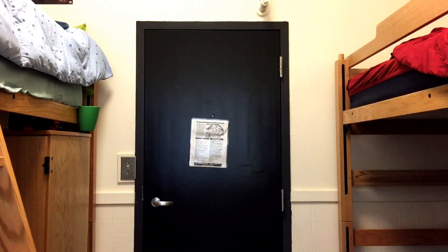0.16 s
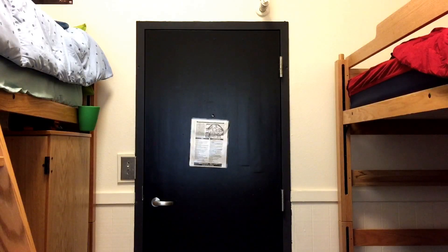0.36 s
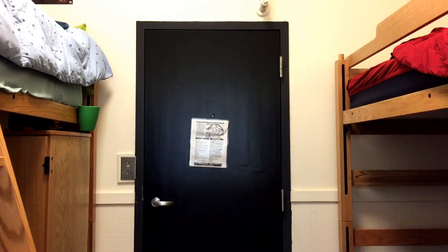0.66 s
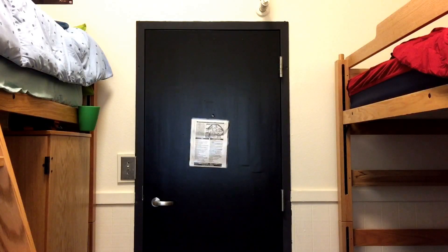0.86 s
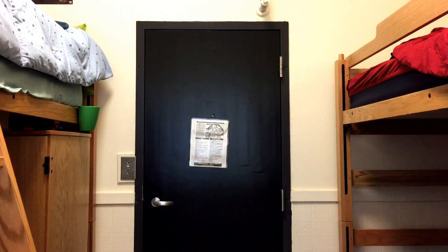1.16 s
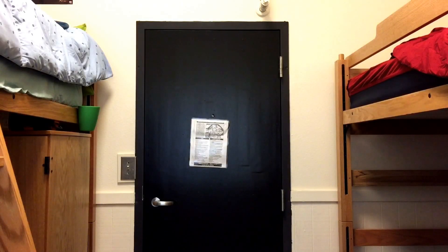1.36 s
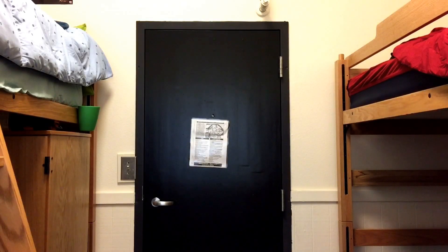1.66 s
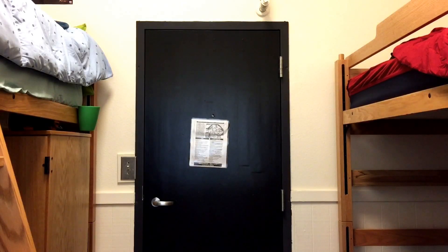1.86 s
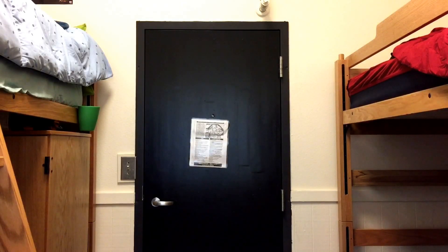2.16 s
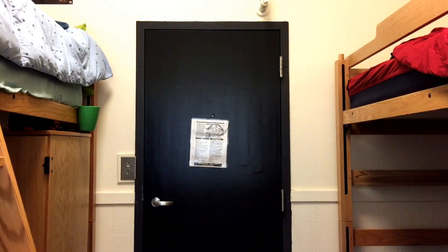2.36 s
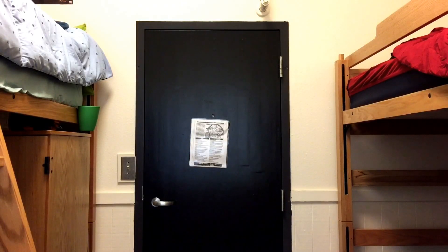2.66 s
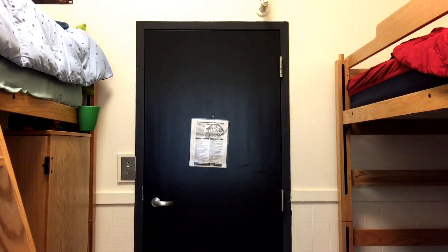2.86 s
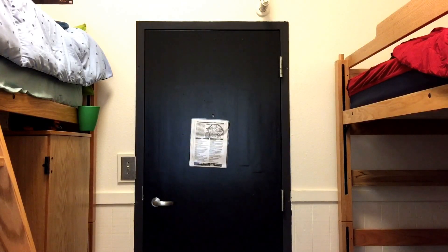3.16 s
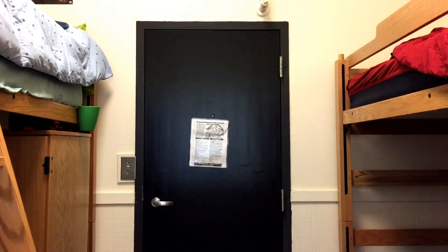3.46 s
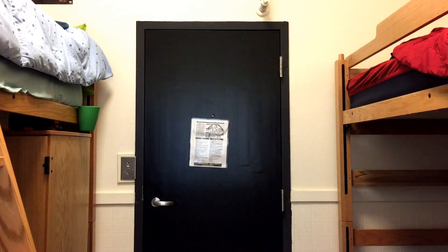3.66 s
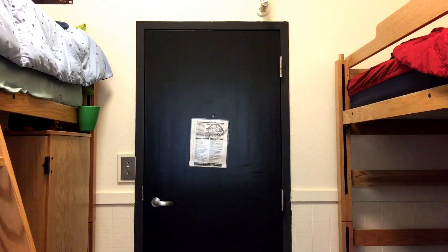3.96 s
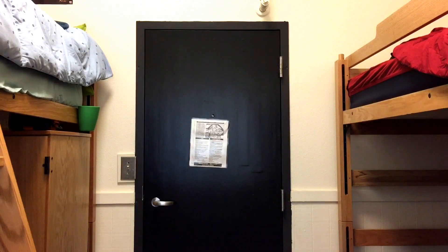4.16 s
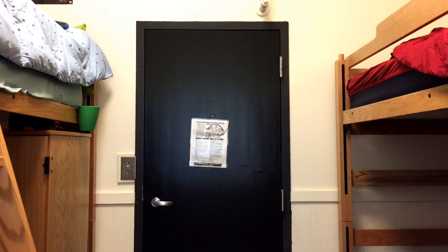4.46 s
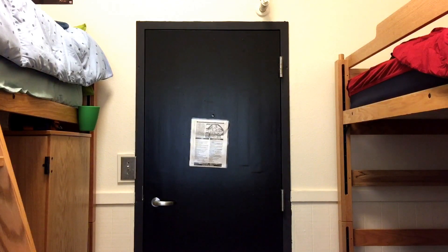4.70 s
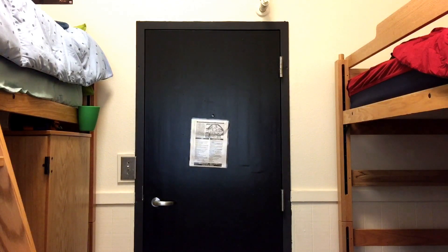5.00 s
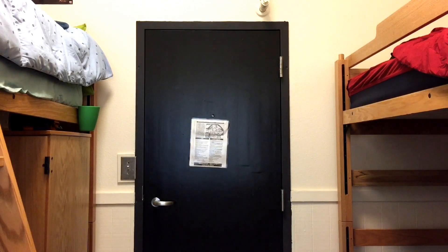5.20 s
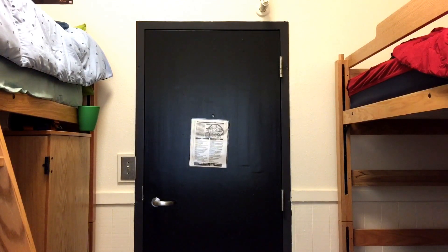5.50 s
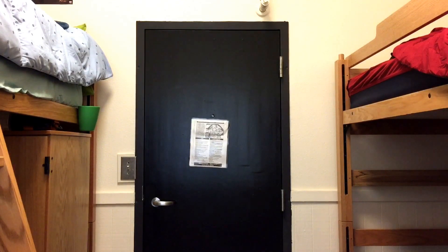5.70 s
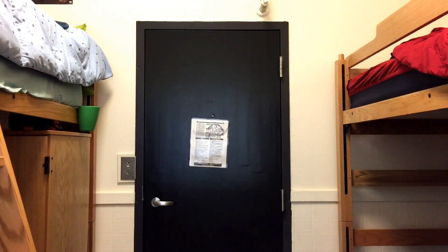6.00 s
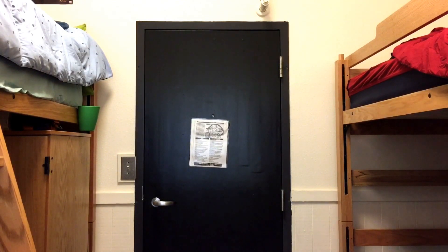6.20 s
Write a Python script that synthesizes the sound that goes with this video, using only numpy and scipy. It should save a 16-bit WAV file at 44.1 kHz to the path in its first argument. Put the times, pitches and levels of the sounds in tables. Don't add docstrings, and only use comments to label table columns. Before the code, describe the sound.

After seconds of low indoor hum and soft distant knocks, sharp key and bolt clacks shake a closed heavy door, with dull low thuds.

```python
import sys
import numpy as np
from scipy import signal
from scipy.fft import rfft, irfft, next_fast_len
from scipy.io import wavfile
from scipy.ndimage import uniform_filter1d

SR = 44100
rng = np.random.default_rng(int(sys.argv[2]) if len(sys.argv) > 2 else 0)


def invert_db(x):
    u = np.asarray(x, float) / 20
    return 10 ** u


def digitize_waveform(pressure):
    field = np.atleast_2d(pressure).T
    bounded = np.clip(field, -1, 1)
    quanta = np.round(bounded * 32767).astype(np.int16)
    wavfile.write(sys.argv[1], SR, quanta)


N = 279594


def in_time(rows):
    s, *columns = np.transpose(rows)
    return [np.interp(np.arange(N) / SR, s, c) for c in columns]


def at_hz(points, hz):
    table_hz, value = np.transpose(points)
    return np.interp(np.log(hz), np.log(table_hz), value)


def rms_one(x):
    return x / np.sqrt(np.mean(x ** 2) + 1e-20)


def drift(rate_hz):
    thin = 40
    r = np.exp(-2 * np.pi * rate_hz * thin / SR)
    noise = rng.standard_normal(N // thin + 2002)
    slow = signal.lfilter([1], [1, -2 * r, r * r], noise)[2000:]
    return np.interp(np.arange(N) / thin, np.arange(len(slow)), rms_one(slow))


def shaped(spectrum):
    size = next_fast_len(N)
    hz = np.maximum(np.fft.rfftfreq(size, 1 / SR), 1)
    return hz, rfft(rng.standard_normal(size)) * invert_db(at_hz(spectrum, hz))


def coloured(spectrum, patchy_db, patch_hz):
    hz, noise = shaped(spectrum)
    out = np.zeros(N)
    step = 2 * np.log2(hz / 25)
    for k in range(15):
        window = np.cos(np.pi / 2 * np.clip(step - k, -1, 1)) ** 2
        patch = irfft(noise * window, next_fast_len(N))[:N]
        out += patch * invert_db(patchy_db * drift(patch_hz))
    return rms_one(out)


def ring(force, hz, t60):
    r, w = invert_db(-60 / (t60 * SR)), 2 * np.pi * hz / SR
    return signal.lfilter([0, np.sin(w)], [1, -2 * r * np.cos(w), r * r], force + 1e-18)


# frequency in Hz, density in dB per Hz.
HISS_SPECTRUM = [(300, -33), (420, -8), (600, -4), (900, -4.5), (1400, -9), (2200, -14), (4300, -18.5),
                 (5000, -21.5), (5600, -19.5), (9300, -24), (10400, -27), (11300, -25), (15000, -27.5),
                 (15900, -25)]


def microphone_hiss():
    noise = irfft(shaped(HISS_SPECTRUM)[1], next_fast_len(N))[:N]
    return invert_db(-65) * rms_one(noise)


# frequency in Hz, density in dB per Hz.
RUMBLE_SPECTRUM = [(50, -18), (80, -16), (110, 4), (150, 2), (200, 1), (260, 3), (320, -4), (362, -5.5),
                   (385, -11.5), (480, -27.5), (700, -47.5)]


def rumble():
    return invert_db(-54.5) * coloured(RUMBLE_SPECTRUM, patchy_db=4.0, patch_hz=9.7)


def hum(curve, tone, flutter_hz):
    hz, share = in_time(tone)
    share = np.clip(share, 0, 1)
    phase = 2 * np.pi * np.cumsum(hz) / SR
    steady = np.sqrt(2) * np.sin(phase)
    noisy = drift(flutter_hz) * np.cos(phase) + drift(flutter_hz) * np.sin(phase)
    return invert_db(in_time(curve)[0]) * (np.sqrt(share) * steady + np.sqrt(1 - share) * noisy)


def throb(per_s, depth):
    rate = per_s * (1 + 0.2003 * drift(1.19))
    return 1 + depth * np.sin(2 * np.pi * np.cumsum(rate) / SR)


# time in seconds, level in dB.
LOW_HUM_LEVEL = [(0.0, -45), (0.1, -44), (0.17, -55), (0.88, -49), (3.69, -63.5), (3.74, -45), (3.99, -67),
                 (4.02, -45.5), (4.29, -59.5), (4.61, -49.5), (5.44, -47), (5.74, -66), (5.79, -56.5),
                 (6.16, -68), (6.22, -52.5), (6.34, -81)]
HIGH_HUM_LEVEL = [(0.0, -65), (0.92, -52), (1.11, -54.5), (1.73, -46), (1.87, -51), (1.99, -41),
                  (3.81, -52.5), (4.17, -69), (4.2, -61.5), (4.45, -53), (4.63, -70.5), (5.35, -55),
                  (5.4, -64), (5.72, -55.5), (6.29, -63.5), (6.34, -70)]
FAN_LEVEL = [(0, -70), (3, -68), (6.34, -65)]
# time in seconds, frequency in Hz, share of steady tone from 0 to 1.
LOW_HUM_TONE = [(0, 154, 0.96), (.3, 156.9, 0.08), (1.5, 154.5, 0.36), (4.2, 156.9, 0.55),
                (4.6, 153.3, 0.36), (5, 150, 0.9), (5.5, 143, 0.82), (5.7, 142.4, 0.8), (6.34, 140, 0.2)]
HIGH_HUM_TONE = [(0, 268, 0.25), (1.4, 265.6, 0.37), (2, 261.8, 0.87), (2.6, 259.1, 0.87), (3.2, 269, 0.84),
                 (3.8, 265.3, 0.77), (4.6, 262.2, 0.63), (5.4, 271.4, 0.44), (6.34, 266.3, 0.74)]
FAN_TONE = [(0, 358.9, 0.74), (6.34, 365.2, 0.36)]


def machinery():
    low = hum(LOW_HUM_LEVEL, LOW_HUM_TONE, flutter_hz=17.8)
    high = hum(HIGH_HUM_LEVEL, HIGH_HUM_TONE, flutter_hz=21.8) * throb(per_s=10.5, depth=0.37)
    fan = hum(FAN_LEVEL, FAN_TONE, flutter_hz=10.6)
    return low + high + fan


# time in seconds, level in dB.
BUSTLE_LEVEL = [(0, -65), (.5, -78), (1.25, -59.5), (2.2, -69.5), (2.7, -69.5), (4, -68), (5.05, -58),
                (5.26, -49.5), (6.34, -69)]
# frequency in Hz, density in dB per Hz.
BUSTLE_SPECTRUM = [(350, -28), (500, -24), (650, -15), (850, 0.5), (1100, 1.5), (1500, -6), (2500, -20),
                   (4000, -70)]


def bustle():
    return invert_db(in_time(BUSTLE_LEVEL)[0] - 10.5) * coloured(BUSTLE_SPECTRUM, patchy_db=4.5, patch_hz=6.4)


# start in seconds, peak level in dB, frequency in Hz.
FAR_KNOCKS = [(0.911, -56, 869), (1.049, -54, 864), (1.147, -55.5, 773), (1.248, -51, 750),
              (1.33, -52, 876), (1.379, -54.5, 807), (1.599, -52, 867), (1.66, -54.5, 804),
              (1.864, -52, 787), (2.135, -60, 864), (2.434, -57, 772)]


def corridor():
    out, puff = np.zeros(N), np.hanning(1800)
    for s, db, hz in FAR_KNOCKS:
        force = np.zeros(8000)
        force[:len(puff)] = puff * rng.standard_normal(len(puff))
        tone = ring(force, hz, 0.14)
        out[round(s * SR):][:len(tone)] += invert_db(db - 3.5) * tone / np.max(np.abs(tone))
    return out


# start in seconds, peak level in dB.
PUSHES = [
    (3.663, -47),
    (4.209, -65),
    (4.903, -46),
    (5.325, -33.5),
    (5.985, -51),
    (6.188, -51.5),
]
# frequency in Hz, density in dB per Hz.
SHUDDER_SPECTRUM = [(20, -58), (32, -25), (45, 9.5), (60, -0.5), (75, 9), (100, -14), (130, -33.5)]


def shudder():
    rise_s, fall_s = 0.048, 0.075
    t, gain = np.arange(N) / SR, invert_db(-67)
    for s, db in PUSHES:
        away = np.maximum((s - t) / rise_s, (t - s) / fall_s)
        gain = gain + invert_db(db - 16) * np.exp(-away)
    return gain * coloured(SHUDDER_SPECTRUM, patchy_db=6.0, patch_hz=2.1)


# frequency in Hz, level in dB, decay time T60 in seconds.
LEAF_MODES = [(86, 4, 0.2), (47.7, -29, 0.17), (128, -36, .15)]


def leaf():
    force = np.zeros(N)
    for s, db in PUSHES:
        force[round(s * SR)] = invert_db(db - 0.5)
    force = np.convolve(force, np.hanning(350) / 175)[:N]
    return sum(invert_db(db) * ring(force, hz, t60) for hz, db, t60 in LEAF_MODES)


# frequency in Hz, decay time T60 in seconds.
ROOM_T60 = [(100, 0.3), (400, 0.29), (1500, 0.16), (4000, 0.23), (7000, 0.2), (12000, 0.17)]


def room(x, gap_s=0.0062):
    age = np.arange(SR // 2) / SR
    tail = np.zeros(len(age))
    for low in 45 * 2. ** np.arange(9):
        octave = signal.butter(2, [low, min(2 * low, .45 * SR)], "band", fs=SR, output="sos")
        decay = invert_db(-60 * age / at_hz(ROOM_T60, 1.4 * low))
        tail += signal.sosfilt(octave, rng.standard_normal(len(age))) * decay
    tail *= np.clip(age / gap_s, 0, 1) ** 2
    return signal.fftconvolve(x, tail / np.sqrt(np.sum(tail ** 2)))[:N]


def rattle(length, per_s, rise):
    age = np.arange(4000) / SR
    draw = rng.random((3, len(age)))
    click = (draw[0] < per_s / SR) * np.sign(draw[1] - .5) * (.4 + draw[2])
    train = click * np.minimum(age / rise, 1) * np.exp(-age / length)
    train[0] = .35
    return train / np.sqrt(np.sum(train ** 2))


def struck(contacts, ranges, per_s, rise, spread_db, longest):
    out = np.zeros(N)
    trains = np.array([rattle(row[-1], per_s, rise) for row in contacts])
    size = trains.shape[1]
    power = uniform_filter1d(np.abs(rfft(trains)) ** 2, size=9)
    for column, modes in enumerate(ranges, 1):
        for m, (hz, mode_db, t60) in enumerate(modes):
            force = np.zeros(N + size)
            strength = invert_db(spread_db * rng.normal(0, 1, len(contacts)))
            strength /= power[:, round(hz / SR * size)] ** .4
            for row, train, chance in zip(contacts, trains, strength):
                at = round(row[0] * SR)
                force[at:at + size] += train * chance * invert_db(row[column] + mode_db - 4.5)
            out += (-1) ** m * ring(force[:N], hz, min(t60, longest))
    return out


# start in seconds, strength in dB,
# brightness in dB, thump in dB, crack in dB under the strength.
BLOWS = [(3.6385, -52, 5.5, -41, -7), (4.191, -33, 2.2, -34.5, 4), (4.2034, -32.5, 3, -33, 7),
         (4.2176, -34.5, -1, -50, 13.5), (4.6069, -33.5, 4.5, -47, 10), (4.6185, -35, 4, -47, 21),
         (4.635, -46.5, 4, -66, 3), (4.873, -37.5, 1.5, -60, 10.5), (4.8857, -34, 1.5, -62, 12),
         (4.9095, -41.5, -7.5, -66, 7.5), (5.035, -51.5, 7, -55, 23), (5.2837, -43, 4, -40.5, 12),
         (5.2942, -37, -1, -66, 9), (5.3065, -33, 2, -46.5, 12), (5.3239, -33, -4.5, -37, 2.5),
         (5.337, -38.5, 1, -46, 7), (5.567, -48.5, -3, -66, 18), (5.94, -40.5, 0.6, -52, 13),
         (6.1554, -27.5, 3, -43.5, 7.5), (6.1649, -28.5, -3.5, -54, 12), (6.2314, -49, 5, -68, 21)]
FUMBLES = [(3.652, -58.5, 11.5, -53, -4), (3.9331, -47.5, 0, -59.5, 10), (4.2934, -49.5, 4.5, -63, 8),
           (4.5136, -48.5, 0.5, -67, 23), (4.694, -50, -2.5, -72, 19), (4.7644, -61, 6, -56, 11),
           (4.8115, -47.5, 1.1, -41.5, 19), (4.835, -47.5, 4, -57, 4), (4.8503, -46.5, 7.5, -41.5, 3),
           (4.927, -48.5, 3, -55, 7), (4.97, -50.5, 2.5, -61, 19), (5.0127, -46, 1.5, -56, 10),
           (5.071, -64, -4, -65, 6), (5.1446, -49, -1.5, -53.5, 6), (5.179, -58.5, 0, -65, -1),
           (5.3486, -53, 7, -54, 10.5), (5.5916, -57, 2.2, -54, 7), (5.7736, -58, 4, -68, -3),
           (5.9094, -47, 0.5, -61, 13), (5.974, -46, 4, -46.5, 11), (5.9967, -51, -7.5, -59, 19),
           (6.072, -61, 8, -57, 11), (6.1976, -48, -8.5, -59, -1)]


def knocks():
    rows = []
    for table, length_s in ((BLOWS, 0.0075), (FUMBLES, 0.014)):
        for s, db, bright_db, thump_db, crack_db in table:
            upper_db, middle_db, top_db = db + bright_db, db - bright_db, db - crack_db
            hollow_db = 20 * np.log10(invert_db(thump_db - 2.5) + invert_db(middle_db - 16.5))
            rows.append((s, upper_db, thump_db, middle_db, top_db, hollow_db, length_s))
    return rows


# frequency in Hz, level in dB, decay time T60 in seconds.
LOW_PANEL = [(320, -7.5, 0.11), (378.8, 5.5, 0.31), (422, -2.5, 0.13), (492, -1, 0.047), (569.5, -4, 0.084),
             (633, -3, 0.092), (722, -4.5, 0.056)]
MIDDLE_PANEL = [(758, -21, 0.014), (908, -5, 0.08), (909, -11.5, 0.22), (1042, 4.5, 0.032),
                (1164, -1.5, 0.074), (1200, -0.5, 0.067), (1360, -1, 0.038), (1355, -7.5, 0.11)]
UPPER_PANEL = [(1420, 2, 0.019), (1517, -5.5, 0.035), (1504, -5, 0.053), (1648, 1.5, 0.042),
               (1722, 0, 0.052), (1842, -11, 0.11), (1904, -6.5, 0.018)]
TOP_PANEL = [(1963, -1.5, 0.022), (2190, 6.5, 0.016), (2235, 2, 0.024), (2364, 6.5, 0.02),
             (2450, -1.5, 0.041), (2743, 7.5, 0.0084), (2990, -4, 0.012), (3160, -0.5, 0.0091)]


def panel():
    thump, hollow = LOW_PANEL[:3], LOW_PANEL[3:]
    ranges = [UPPER_PANEL, thump, MIDDLE_PANEL, TOP_PANEL, hollow]
    return struck(knocks(), ranges, per_s=1800, rise=0.0062, spread_db=1.5, longest=.1)


# start in seconds, lock case level in dB,
# dullness as dB lost per step from case to key to edge.
TICKS = [(3.639, -56.5, 8), (4.195, -43, 16), (4.209, -64, 17), (4.609, -41.5, 8), (4.631, -56, 7.5),
         (4.814, -62, 7), (4.85, -60, 10), (4.897, -50.5, 14), (5.023, -51.5, 12.5), (5.142, -58.5, 16),
         (5.297, -51.5, 12), (5.322, -42, 3), (5.334, -61, 7), (5.347, -46, 7), (5.361, -57, 4),
         (5.772, -66, 6), (5.942, -69, 11), (6.156, -39.5, 9.5), (6.171, -53, 12), (6.2, -59, 18)]
# frequency in Hz, level in dB, decay time T60 in seconds.
CASE = [(3800, 3, 0.0057), (3880, 4, 0.0025), (4630, -8, 0.0037), (4343, 9, 0.0081), (4550, 5, 0.0087),
        (5580, 4.5, 0.0038)]
KEY = [(5940, -29, 0.0021), (5930, 3, 0.007), (7280, 8, 0.0089), (7910, -0.5, 0.0063), (8430, 9.5, 0.0056),
       (9010, 3, 0.0074), (10030, 0, 0.0033)]
EDGE = [(11200, 5, 0.0054), (13100, 14, 0.006), (12900, -23, 0.0055), (13800, -1, .004), (14600, -6, .004),
        (15400, 4, 0.0062)]
SLIDE = [(1300, -2, .03), (1500, -3, 0.031), (1700, 4, 0.042), (2020, 2.5, 0.034), (2280, 0, .03),
         (2420, -3.5, .025)]


def metal():
    rise_s = 0.0024
    ticks = [(s, db, db - dull_db, db - 2 * dull_db, 0.0052) for s, db, dull_db in TICKS]
    ticking = struck(ticks, [CASE, KEY, EDGE], per_s=5000, rise=rise_s, spread_db=1.5, longest=.012)
    slide = (3.915, -44, 0.013)
    return ticking + struck([slide], [SLIDE], per_s=3000, rise=rise_s, spread_db=0, longest=.1)


def lock():
    delay_s = 0.002496
    return np.roll(panel() + metal(), round(delay_s * SR))


def scene():
    background = machinery() + rumble() + shudder() + bustle() + corridor()
    door = lock()
    return (background + leaf() + door + invert_db(-4.5) * room(door))[None]


def band_limit(x):
    return signal.sosfilt(signal.butter(12, 15750, fs=SR, output="sos"), x)


def record(dry):
    top_cut = signal.cheby2(12, 60, 16500, fs=SR, output="sos")
    mix = signal.sosfilt(top_cut, dry + microphone_hiss())
    return band_limit(mix)


dry = scene()
out = record(dry)
digitize_waveform(out)
```